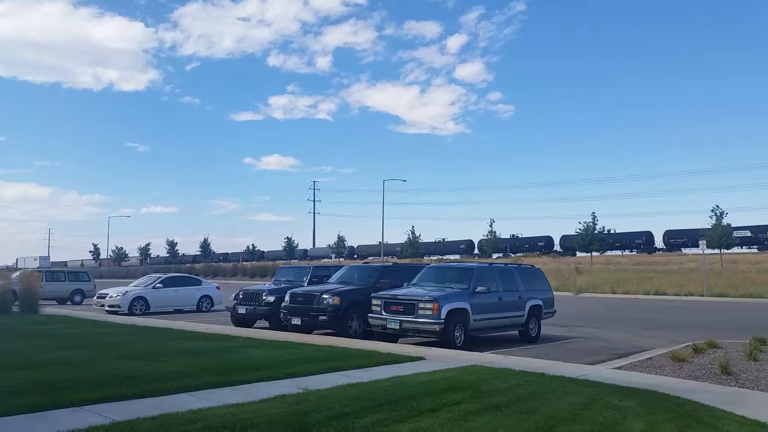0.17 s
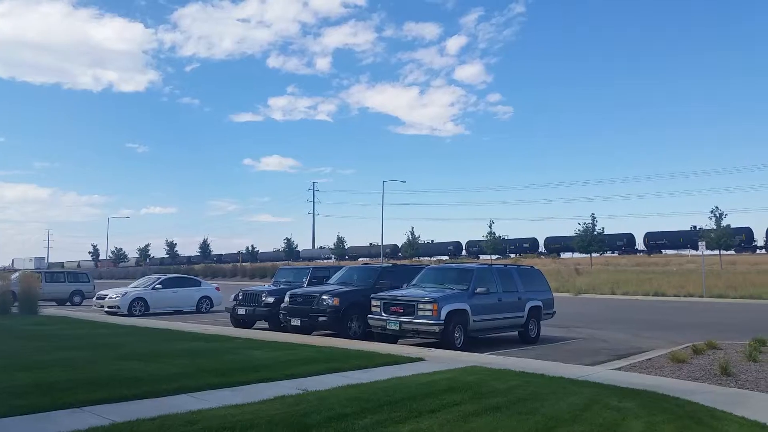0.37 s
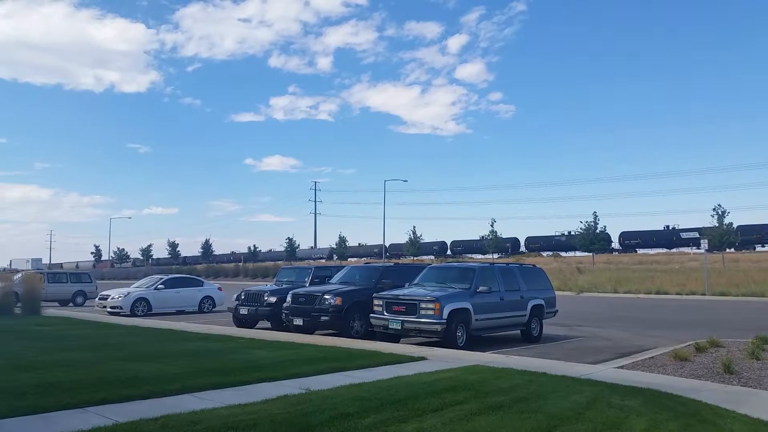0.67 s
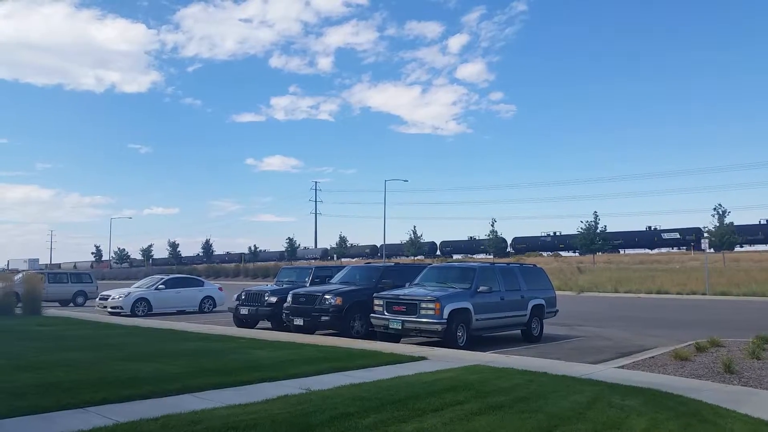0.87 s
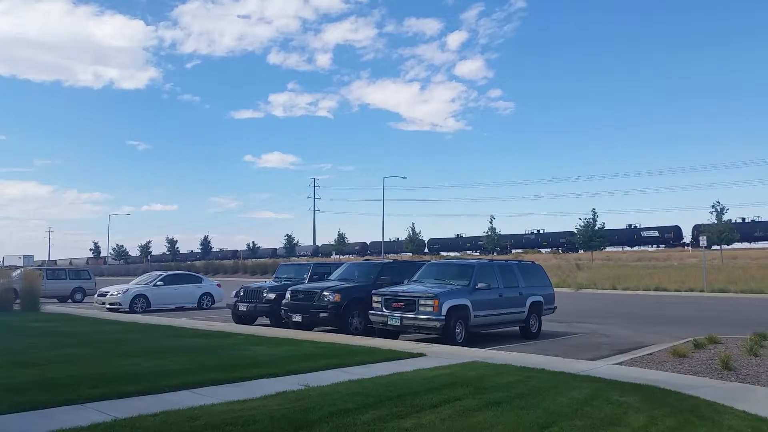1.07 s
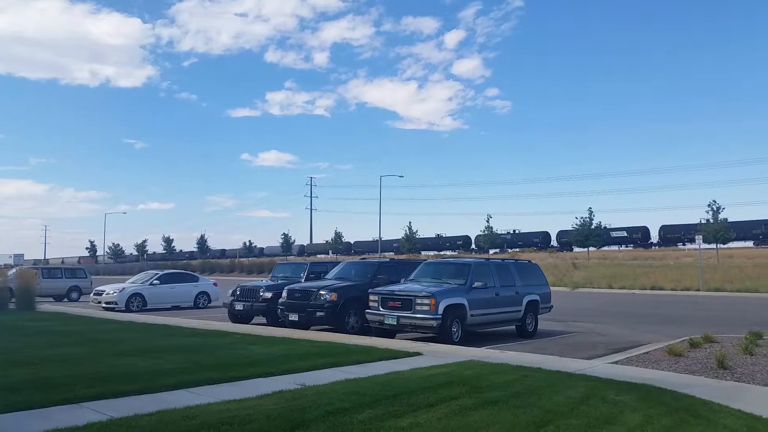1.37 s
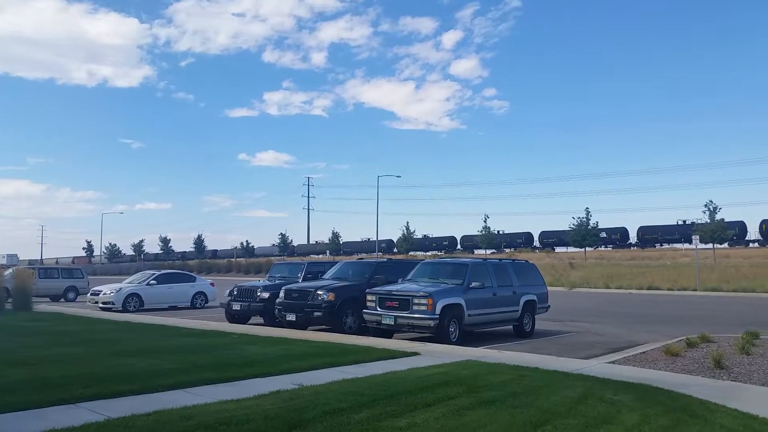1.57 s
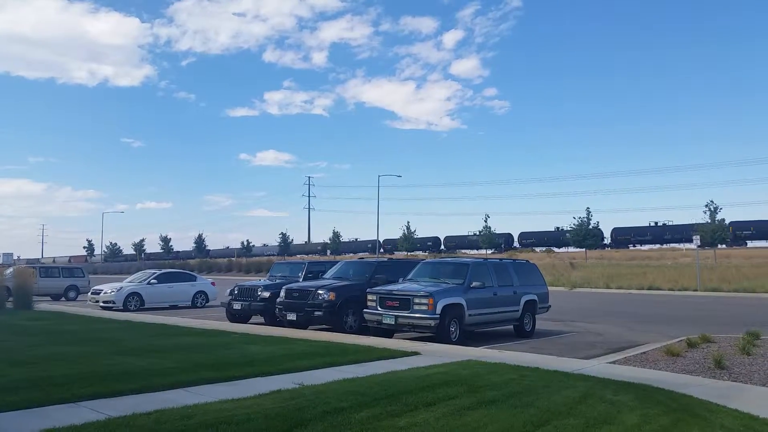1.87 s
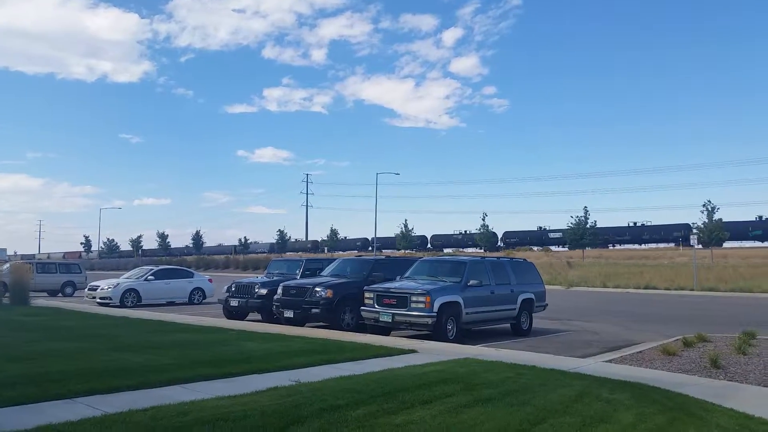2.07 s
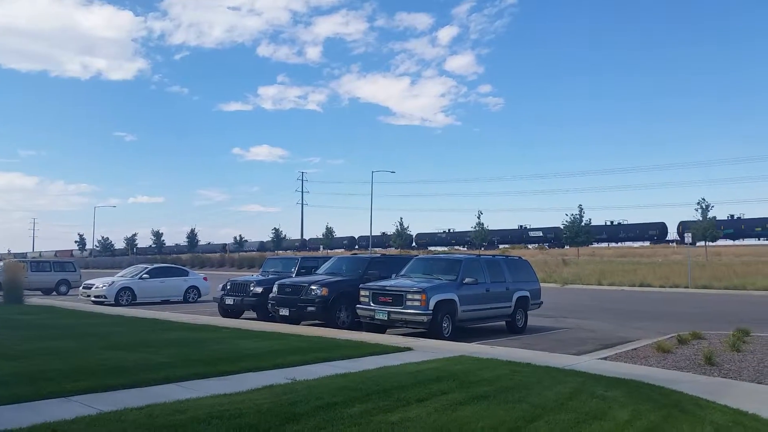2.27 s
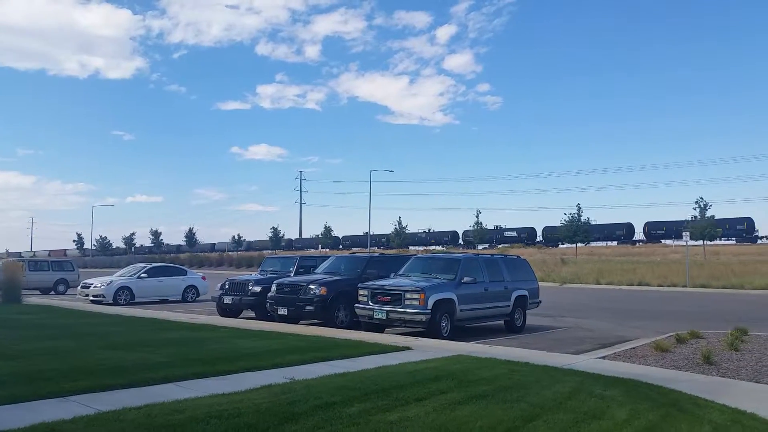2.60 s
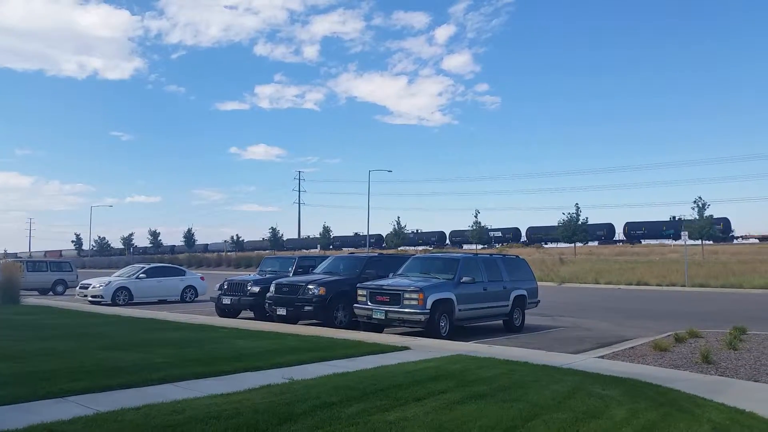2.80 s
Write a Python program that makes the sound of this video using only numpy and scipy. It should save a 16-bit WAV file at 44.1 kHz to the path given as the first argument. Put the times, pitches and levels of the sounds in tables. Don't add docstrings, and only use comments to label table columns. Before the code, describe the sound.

Steady far-off train rumble with dull booms, soft knocks and a grinding, faintly singing rail rush, barely audible squeaks and a slight grassy breeze, heard outdoors from across a parking lot in stereo with faint hiss.

```python
import sys
import numpy as np
from scipy import signal
from scipy.fft import rfft, irfft, next_fast_len
from scipy.io import wavfile
from scipy.ndimage import uniform_filter1d, map_coordinates

SR = 44100
rng = np.random.default_rng(int(sys.argv[2]) if len(sys.argv) > 2 else 0)


def decibels_to_gain(level_db):
    exponent = np.asarray(level_db, float) / 20
    return 10 ** exponent


def unload_audio(sound):
    columns = np.transpose(np.atleast_2d(sound))
    steps = np.round(np.clip(columns, -1, 1) * 32767)
    wavfile.write(sys.argv[1], SR, steps.astype(np.int16))


N = 129654


def unit(x):
    return x / np.sqrt(np.mean(x ** 2) + 1e-20)


def along(points, hz):
    f, v = np.transpose(points)
    return np.interp(np.log(hz + 1), np.log(f + 1), v)


def colour(points, hz):
    octaves_over = np.log2(np.maximum(hz / points[-1][0], 1))
    in_band = (hz > points[0][0] / 2) * (hz < 15760)
    return decibels_to_gain(along(points, hz) - 60 * octaves_over) * in_band


def curves(rows):
    s, *cols = np.transpose(rows)
    return [np.interp(np.arange(N) / SR, s, c) for c in cols]


def wobble(rate):
    knots = rng.standard_normal(int(N * rate / SR) + 4)
    return map_coordinates(knots, [np.arange(N) * rate / SR])


def filtered(x, response):
    m = next_fast_len(N + SR // 4)
    return irfft(rfft(x, m) * response(np.fft.rfftfreq(m, 1 / SR)), m)[..., :N]


def bump(s, length, edge):
    t = np.arange(N) / SR
    return np.clip(np.minimum(t - s, s + length - t) / edge, 0, 1)


def patchy(patchy_db):
    z = signal.stft(rng.standard_normal((2, N)), nperseg=512)[2]
    field = rng.standard_normal(z.shape[1:])
    field = uniform_filter1d(field, size=5, axis=0)
    field = uniform_filter1d(field, size=12, axis=1)
    return signal.istft(z * decibels_to_gain(patchy_db * unit(field)), nperseg=512)[1][:, :N]


# freq_hz, likeness (0-1)
ALIKE = [(60, 0.99), (250, 1), (750, 0.55), (1100, 0.9), (1400, 0.2), (2050, 0.6), (2480, 0.22),
         (4000, 0.35)]
# freq_hz, phase_rad
LAG = [(0, -1), (780, 0.02), (1100, 1.8), (1350, 1.47), (2070, 5.5), (2550, 4), (3270, 9), (5000, 14.5)]
# freq_hz, level_db
RIGHT = [(180, 1.5), (600, 1.5), (900, -3), (1280, -0.5), (1600, -6), (2600, 0.5), (3900, -38.5),
         (7000, -26.5)]


def ports(pair, spectrum, right=RIGHT):
    def shared_and_differing(hz):
        turn = np.arccos(np.clip(along(ALIKE, hz), 0, 1)) / 2
        return colour(spectrum, hz) * np.array([np.cos(turn), np.sin(turn)])

    def right_port(hz):
        return decibels_to_gain(along(right, hz)) * np.exp(1j * np.interp(hz, *np.transpose(LAG)))

    mid, side = filtered(pair, shared_and_differing)
    left = mid + side
    return np.array([left, filtered(mid - side, right_port)]) / np.std(left)


def evened(pair):
    window_s, share = .07, 0.47
    power = uniform_filter1d(np.mean(pair ** 2, axis=0), size=int(window_s * SR))
    return unit(pair * (np.abs(power) + 1e-3) ** (-share / 2))


# start_s, rumble_db, drum_db
ROLL = [(0, -24, -17.5), (.1, -25, -26.5), (.22, -22, -20.5), (.4, -25, -23.5), (.58, -24, -23),
        (.75, -26.5, -22.5), (.95, -22.5, -24.5), (1.15, -27, -23), (1.33, -26, -22), (1.52, -24, -24.5),
        (1.65, -26, -25.5), (1.9, -22.5, -25), (2.1, -20.5, -23.5), (2.3, -27, -23), (2.5, -26, -22),
        (2.68, -26, -24), (2.85, -25.5, -22.5), (2.94, -20.5, -21.5)]
# freq_hz, level_db (per Hz)
RUMBLE = [(22, -18), (45, -13), (63, 2), (85, -2), (115, -3), (160, -18.5), (250, -27.5)]
# freq_hz, level_db (per Hz)
DRUM = [(60, -29.5), (100, -9), (130, 1.5), (200, 1), (300, -6), (400, -19), (520, -33)]


def rolling_cars():
    rumble_db, drum_db = curves(ROLL)
    rumble_gain = decibels_to_gain(rumble_db + 1 + 0.32 * wobble(24.0))
    drum_gain = decibels_to_gain(drum_db - 0.5 + 0.9 * wobble(8.1))
    rumble = rumble_gain * evened(ports(patchy(patchy_db=-0.54), RUMBLE))
    drum = drum_gain * evened(ports(patchy(patchy_db=1.44), DRUM))
    return rumble + drum


# start_s, contact_db, clear_db
WHEELS = [(0, -37.5, 2), (.2, -35.5, -1.5), (.4, -36, 2), (.6, -37, 1.5), (.9, -36.5, -1), (1.2, -37.5, 0),
          (1.55, -38, 0), (1.63, -38.5, -0.5), (1.72, -37, 0.5), (2.1, -37.5, -0.1), (2.4, -37, 0.5),
          (2.7, -37.5, 1.9), (2.94, -38, 1.5)]
# start_s, level_db
JOINTS = [
    (.36, -48.5),
    (.965, -36),
    (2.43, -38.5),
]
# freq_hz, level_db (per Hz)
RUSH = [(300, -10.5), (520, -8.5), (720, -1.5), (900, 0), (1100, -6.5), (1400, -12.5), (2000, -28.5)]
# freq_hz, level_db (per Hz)
GRIND = [(700, -22), (1100, -4.5), (1350, -3.5), (1650, -1), (2100, -4.5), (2900, -16), (3600, -32.5)]
# freq_hz, level_db (per Hz)
SING = [(2400, -26), (2900, -9), (3500, -0.5), (4100, 1), (5000, -8.5), (6000, -18), (7400, -31),
        (8000, -52.5)]


def wheels():
    joint_s, sing_db = .08, -4
    contact_db, clear_db = curves(WHEELS)
    joints = sum(decibels_to_gain(db) * bump(s, joint_s, joint_s / 2) for s, db in JOINTS)
    rush_gain = decibels_to_gain(contact_db + 1 + 0.22 * wobble(3.4))
    grind_gain = decibels_to_gain(contact_db + clear_db + 1 + 0.24 * wobble(3.3))
    sing_gain = decibels_to_gain(contact_db + sing_db + 0.26 * wobble(6.1))
    rush = rush_gain * ports(patchy(patchy_db=1.0), RUSH)
    grind = np.hypot(grind_gain, joints) * ports(patchy(patchy_db=0.9), GRIND)
    sing = np.hypot(sing_gain, joints * decibels_to_gain(sing_db)) * ports(patchy(patchy_db=1.14), SING)
    return rush + grind + sing


# start_s, upper_db, lower_db
HUM = [(0.0, -50, -44.5), (0.69, -50.5, -54), (0.83, -42.5, -40.5), (1.039, -49, -49.5), (1.13, -45, -48),
       (1.28, -46.5, -61), (1.49, -40, -56), (1.56, -36.5, -50), (1.6, -53, -47), (1.7, -41, -44),
       (1.98, -66, -60), (2.109, -48.5, -50), (2.24, -60, -43), (2.59, -49, -47), (2.67, -36, -38.5),
       (2.78, -37.5, -57), (2.85, -45, -43), (2.94, -40, -66)]


def hums():
    pitches_hz, width_hz, flutter_db = (455, 409), 7, 3
    tone = np.zeros(N)
    for level_db, pitch_hz in zip(curves(HUM), pitches_hz):
        phase = 2 * np.pi * np.cumsum(pitch_hz + width_hz / 2 * wobble(14)) / SR
        gain = decibels_to_gain(level_db - 2.5 + flutter_db * wobble(15))
        tone += gain * np.sqrt(2) * np.sin(phase)
    return tone * decibels_to_gain([[-.6], [.6]])


# start_s, level_db
BREEZE = [(0, -79.5), (.13, -76), (.35, -70.5), (.6, -72), (.8, -75.5), (1.0, -69), (1.18, -69),
          (1.36, -69), (1.47, -78.5), (1.9, -86), (1.99, -74), (2.05, -70.5), (2.2, -79.5), (2.94, -80.5)]
# freq_hz, level_db (per Hz)
LEAVES = [(3000, 13.5), (6200, 3.5), (7400, -2), (8000, -31.5), (9000, -31), (11100, -15.5), (12700, 0),
          (14500, -18.5)]
# freq_hz, level_db
RIGHT_LEAVES = [(3000, -4), (6000, -29), (7500, -22), (12700, -14)]


def breeze():
    gust_db, = curves(BREEZE)
    gain = decibels_to_gain(gust_db + 21.5 + .8 * wobble(14))
    return gain * ports(patchy(patchy_db=-2.5), LEAVES, RIGHT_LEAVES)


# freq_hz, level_db (per Hz)
BUFFET = [(20, -14.5), (40, -5), (70, -0.5), (150, -3)]


def buffet():
    lumps = decibels_to_gain(2.4 * np.array([wobble(4.1), wobble(41)]))
    wind = filtered(rng.standard_normal((2, N)), lambda hz: colour(BUFFET, hz))
    return decibels_to_gain(-36) * unit(lumps * wind)


def booms(rows, length_s, gain_db):
    s, hz, db = np.transpose(rows)[:, :, None]
    t = np.arange(-SR // 10, SR // 10)
    envelope = decibels_to_gain(db + gain_db) * np.exp(-.5 * (t / SR / length_s) ** 2)
    swell = envelope * np.sin(2 * np.pi * (hz * t / SR + rng.random((len(rows), 1))))
    at = np.clip((s * SR).astype(int) + t, 0, N)
    tone = np.bincount(at.ravel(), swell.ravel(), N + 1)[:N]
    return tone * decibels_to_gain([[-.75], [.75]])


# start_s, pitch_hz, level_db
THUDS = [(0.022, 170, -34), (0.05, 187, -23), (0.207, 77, -15.5), (0.232, 144, -17.5), (0.244, 207, -21),
         (0.287, 129.5, -16.5), (0.342, 116, -24), (0.414, 168, -19.5), (0.444, 75.6, -17),
         (0.464, 118, -23), (0.574, 68, -20), (0.594, 109, -21), (0.651, 83, -21), (0.813, 116, -20.5),
         (0.995, 71, -18.5), (1.09, 118, -23), (1.15, 67, -18), (1.152, 120, -17.5), (1.2, 75, -22.1),
         (1.232, 130, -19.5), (1.337, 124, -18), (1.344, 71, -17.5), (1.384, 66, -21.6), (1.389, 112, -21),
         (1.507, 75, -15.5), (1.512, 160, -19), (1.546, 116, -20), (1.564, 64.7, -25.5), (1.674, 83.5, -21),
         (1.704, 98, -20), (1.719, 157, -19.5), (1.793, 134, -23), (1.888, 80, -17.5), (1.983, 123, -24),
         (2.09, 74.5, -22), (2.093, 170.4, -18.5), (2.148, 79, -21), (2.287, 184, -22.5),
         (2.492, 109.6, -20), (2.584, 211, -23.5), (2.589, 108, -22), (2.671, 107, -16),
         (2.689, 186, -20.5), (2.751, 142.5, -20.5), (2.794, 144, -20.5), (2.849, 133, -17.5),
         (2.856, 75.6, -13.5), (2.918, 78, -13)]


def axle_thuds():
    return booms(THUDS, length_s=0.015, gain_db=2)


# start_s, pitch_hz, level_db
KNOCKS = [
    (.14, 314, -29),
    (.79, 279, -25),
    (1.08, 304, -27),
    (1.262, 290, -24),
    (1.71, 264, -26),
    (1.93, 344, -29),
    (2.46, 292, -24),
    (2.75, 320, -32.5),
]


def coupling_knocks():
    return booms(KNOCKS, length_s=0.013, gain_db=0.5)


# start_s, length_s, pitch_hz, level_db
SQUEAKS = [
    (1.145, .105, 6715, -60),
    (2.41, .085, 7355, -63.5),
    (2.0, .07, 7365, -73),
]


def squeaks():
    t = np.arange(N) / SR
    tone = np.zeros(N)
    for start_s, length_s, pitch_hz, level_db in SQUEAKS:
        gain = decibels_to_gain(level_db + 1.32 * wobble(40)) * bump(start_s, length_s, edge=.015)
        tone += gain * np.sin(2 * np.pi * pitch_hz * t)
    return tone * decibels_to_gain([[0], [-17]])


def scene():
    train = rolling_cars() + wheels() + hums() + axle_thuds() + coupling_knocks() + squeaks()
    return train + breeze() + buffet()


# freq_hz, level_db (per Hz)
PREAMP = [(3000, 7), (6000, -2.5), (7500, -9.5), (8300, -7), (9700, -4), (11000, -3), (12300, 5.5),
          (15700, 2)]


def preamp_hiss():
    hiss = filtered(rng.standard_normal((2, N)), lambda hz: colour(PREAMP, hz))
    return decibels_to_gain(-73.5) * unit(hiss)


def low_pass(x):
    return signal.sosfilt(signal.butter(12, 15760, fs=SR, output="sos"), x)


def record(dry):
    def left_gap(hz):
        return decibels_to_gain(-40 * ((hz > 8150) & (hz < 8950)) * [[1], [0]])

    fade = np.sin(np.pi / 2 * bump(0, N / SR, edge=.008)) ** 2
    mix = filtered(fade * dry + preamp_hiss(), left_gap)
    return low_pass(mix)


dry = scene()
out = record(dry)
unload_audio(out)
```